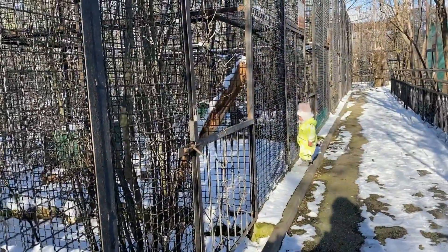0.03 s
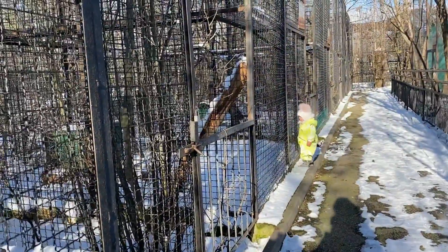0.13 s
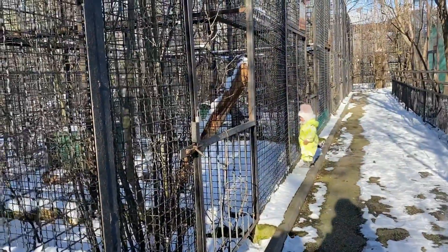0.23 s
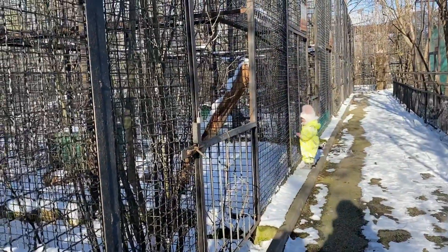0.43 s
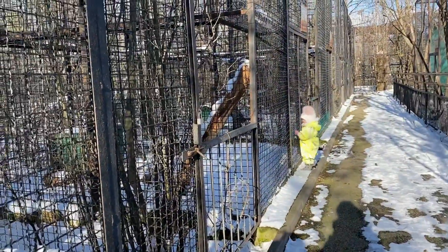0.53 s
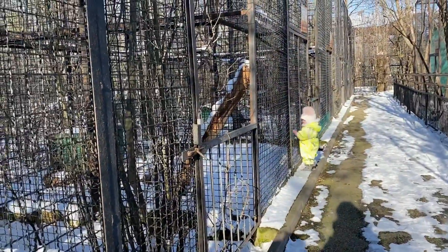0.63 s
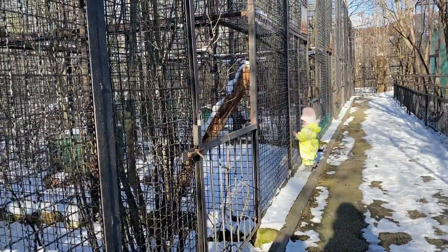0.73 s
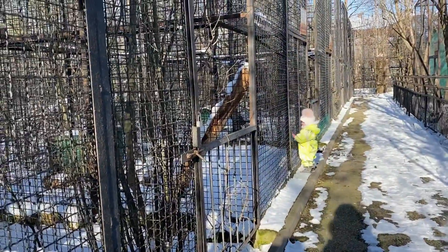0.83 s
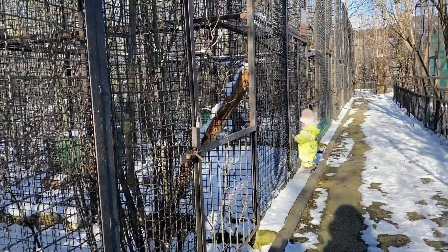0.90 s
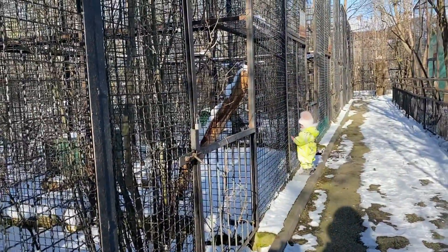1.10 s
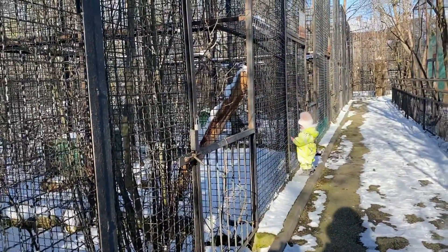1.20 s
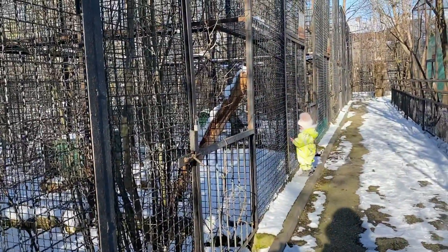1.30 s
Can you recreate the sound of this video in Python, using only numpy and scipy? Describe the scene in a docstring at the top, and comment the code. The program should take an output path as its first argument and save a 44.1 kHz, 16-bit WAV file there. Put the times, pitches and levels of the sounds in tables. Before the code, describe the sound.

Two quick, dry, snapping crunches with dull thuds, like icy snow or knocked wire mesh, close and slightly left; then weak bumps and light clothing rustle over a very faint low outdoor rumble.

```python
"""Outdoors, close to the microphone: near sounds lean left over a low distant rumble that lasts throughout.
A faint crunch and thud open it, over soft rustle; a dry tick follows at 0.1 s.
Near 0.25 and 0.48 s come two dry crunches, probably icy snow underfoot: scrapes and swarms of tiny contacts
swell to sharp snaps over dull thuds, unevenly coloured. Then a weak crunch, soft bumps and two strokes of
rustle, probably winter clothing, made of grainy impulses; a tiny reedy chirp of banded noise comes at 1.06 s."""
import sys
import numpy as np
from scipy.fft import rfft, irfft
from scipy.io import wavfile
from scipy.ndimage import map_coordinates

SR = 44100
rng = np.random.default_rng(int(sys.argv[2]) if len(sys.argv) > 2 else 0)


def dump(signal):
    """Clip the signal to [-1, 1] and save it as 16-bit WAV at the path in sys.argv[1]."""
    limited = np.clip(np.atleast_2d(signal).T, -1, 1)
    pcm = np.round(limited * 32767).astype(np.int16)
    wavfile.write(sys.argv[1], SR, pcm)


N = 59535

# crunches, swarms of hard contacts: crest_s, level_db, rise_db_per_s, fall_db_per_s, hollow_level_db
CRUNCHES = [(0.005, -40.5, 494, 531, -43), (0.253, -20.5, 554, 566.5, -26.5), (0.481, -27, 766, 698, -33.5),
            (0.664, -53.5, 290, 203, -56.5)]
# scrapes that lead into the crunches: crest_s, level_db, rise_db_per_s, fall_db_per_s
SCRAPES = [(0.160, -39, 606, 121), (0.205, -48, 212.5, 91), (0.234, -24, 682, 495), (0.25, -29, 908, 697.5),
           (0.449, -53.5, 602, 291.5), (0.465, -26.5, 715, 422)]
# sharp snaps: start_s, level_db, hollow_level_db
SNAPS = [(0.143, -52, -41.5), (0.2372, -23.5, -16), (0.2437, -20.5, -29), (0.245, -16.5, -24.5),
         (0.2513, -18.5, -24.5), (0.2550, -15.5, -24), (0.2648, -18, -43), (0.2722, -20, -36.5),
         (0.4597, -31, -32), (0.4736, -21.5, -28.5), (0.4790, -18, -29), (0.4858, -25, -30),
         (0.5072, -57, -52), (0.54, -47, -43.5)]
# brightest cracks: start_s, level_db
CRACKS = [(0.228, -35), (0.2345, -23.5), (0.243, -23.5), (0.2651, -46.5), (0.4727, -39.5)]
# relative colour of the hard contacts: freq_hz, gain_db
HARD_COLOUR = [(200, -25), (1150, -14.5), (1550, 7.5), (2300, -2.5), (3100, -3.5), (3700, -4),
               (4700, -10.5), (6600, -9), (7600, -20.5), (9000, -20), (11000, -25), (12500, -51.5),
               (15000, -62.5)]
# relative colour of the hollow body: freq_hz, gain_db
HOLLOW_COLOUR = [(60, -10), (200, -6.5), (300, -10), (450, -8.5), (560, -2), (690, 1), (850, -8.5),
                 (970, -9.5), (1200, -15), (2500, -28.5), (8000, -76.5)]
# relative colour of the scrapes: freq_hz, gain_db
SCRAPE_COLOUR = [(300, -30), (1100, -3.5), (1550, 6.5), (1950, -1.5), (2350, -8), (3000, -8.5), (3600, -17),
                 (6500, -29.5), (9000, -39)]
# relative colour of the cracks: freq_hz, gain_db
CRACK_COLOUR = [(1000, -33.5), (5000, 0.5), (7000, -4), (8500, -4), (11000, -10.5), (15000, -26.5)]
# uneven fine colour of the crunches, narrow bands relative to each other: centre_hz, width_hz, gain_db
CRUNCH_BANDS = [(1480, 43, -4), (1760, 76, -12.5), (2005, 32, 6.5), (2063, 28, -5.5), (2031, 14, 0),
                (2736, 37, 2), (3070, 150, 7), (3320, 150, 5), (4040, 34, 0.5), (4450, 45, -9.5),
                (4980, 62.8, 11), (5860, 470, 6)]
BANDS_DB = 3.5  # highest point of the bands against the direct contact
TRICKLE_DB, TRICKLE_FALL_DB_PER_S = -28.5, 124.5  # against the crest
CONTACTS_PER_S, CONTACT_SPREAD_DB, CLUMP_DB, CLUMPS_PER_S = 5000, 4, 2.5, 330
CRACK_T60_S = 0.028
SNAP_T60_S, SNAP_LENGTH_S = .012, .0025  # the length sets the energy at the given level

# thuds: start_s, level_db, pitch_hz, t60_s
THUDS = [(0.001, -27, 65.4, 0.092), (0.148, -39, 91.6, .16), (0.237, -26.5, 193.8, 0.064),
         (0.25, -27.5, 57.5, 0.14), (0.258, -26.5, 172, 0.089), (0.364, -32, 152, 0.1),
         (0.367, -34.5, 63, .10), (0.482, -36, 70.3, 0.25), (0.491, -32, 148, 0.077),
         (0.622, -41, 87, 0.18), (0.696, -44, 81, 0.2193), (0.846, -36.5, 190.3, 0.13),
         (0.849, -32.5, 310, 0.065), (0.859, -40.5, 70.6, 0.086)]
# relative colour of the puff in a thud: freq_hz, gain_db
PUFF_COLOUR = [(30, -1.5), (100, 5), (500, -0.5), (1000, -14), (3000, -25), (12000, -72.5)]
THUD_ATTACK_S, PUFF_DB = .005, -14  # the puff is relative to the thud

# path of the rustle: time_s, hiss_level_db, body_level_db
RUSTLE = [ (0, -55.5, -49), (.13, -56.5, -52), (.33, -55.5, -51.5), (0.578, -60.5, -51.5),
          (0.658, -60.5, -68), (0.758, -61, -55), (0.818, -67.5, -64.5), (.93, -66.5, -59.5),
          (.98, -71.5, -63.5), (1.018, -95, -91.5), (1.079, -76, -81.5), (1.15, -58.5, -57),
          (1.21, -60, -56.5), (1.29, -64.5, -56.5), (1.35, -59, -54.5)]
# catches of the cloth: start_s, hiss_level_db, body_level_db
CATCHES = [(0.682, -54, -48), (0.846, -55.5, -40.5), (0.919, -64.5, -52), (1.105, -61, -62),
           (1.141, -60.5, -49), (1.159, -51, -55), (1.205, -53, -58), (1.214, -50.5, -57),
           (1.245, -79, -44.5), (1.251, -50.5, -48.5), (1.272, -51, -46)]
# relative colour of the cloth hiss: freq_hz, gain_db
CLOTH_COLOUR = [(800, -19.5), (1300, 2.5), (2250, -7), (3000, -3), (3600, -11), (5500, -3.5), (7000, -13.5),
                (8000, -12.5), (10000, -16), (12500, -38.5), (14500, -30.5)]
# relative colour of the cloth body: freq_hz, gain_db
CLOTH_BODY_COLOUR = [(60, -5.5), (170, -5), (400, -3.5), (560, -1), (750, -11.5), (1000, -9.5),
                     (1500, -21.5), (4000, -50)]
# narrow bands of the first stroke, ahead of the cloth colour: centre_hz, width_hz, gain_db
FIRST_STROKE = [(1930, 153, -16.5), (2750, 88, 0.5), (4943, 164, -1), (6580, 280, -3)]
# narrow bands of the second stroke, ahead of the cloth colour: centre_hz, width_hz, gain_db
SECOND_STROKE = [(3114, 410, 0.5), (3800, 150, -15), (4950, 210, -6.5), (6430, 230, -5)]
FIBRES_PER_S, FIBRE_SPREAD_DB, CATCH_T60_S = 6000, 4, .026
STROKE_START_S, TURN_S = .62, .94
STROKE_DB, FLUTTER_DB, FLUTTER_PER_S = 1, 2.5, 140  # the stroke is relative to the hiss

# relative colour of the tick: freq_hz, gain_db
TICK_COLOUR = [(400, -21), (800, -10), (1150, -4), (1700, -8), (3500, -15), (7000, -42), (12000, -61.5)]
TICK_S, TICK_DB, TICK_T60_S = .0975, -44, .025
CHIRP_S, CHIRP_LENGTH_S, CHIRP_HZ, CHIRP_WIDTH_HZ, CHIRP_DB = 1.058, .007, 6280, 380, -64
# relative colour of the far rumble: freq_hz, gain_db
RUMBLE_COLOUR = [(20, -49.5), (45, -10), (72, -1.5), (100, 3.5), (130, -16.5), (300, -22.5), (1000, -39),
                 (3000, -34.5), (7000, -42), (12000, -49.5)]
RUMBLE_DB, RUMBLE_LEFT_DB = -61, 1  # the second is extra gain on the left

# balance of the near sounds: freq_hz, left_minus_right_db
BALANCE = [(60, 3.5), (250, 4.5), (420, 4), (700, 8.5), (950, 8.5), (1250, 2.5), (1700, 2), (2200, -0.5),
           (15000, 1)]
# how much sooner the left port hears; bass bends around the body: freq_hz, lead_s
PORT_LEAD = [(100, .00055), (260, .00069), (430, .00075), (600, .00068), (1000, .00037), (1500, .00037),
             (2050, .00032), (2600, .00039), (3200, .00039), (4000, .00044), (6500, .00047),
             (10000, .00036), (14000, .00023)]
# relative gain of the scatter off nearby surfaces: freq_hz, gain_db
SCATTER_COLOUR = [(100, -5.5), (1000, -1.5), (2000, -1.5), (4000, 7.5), (8000, 9.5), (13000, 3)]
SCATTER_DB, SCATTER_T60_S, SHIFTS_PER_S = -10, .018, 120
TOP_HZ = 15750


def amp(db):
    """Decibels to gain."""
    return 10 ** (np.asarray(db) / 20)


def unit(x):
    """Scale to rms 1."""
    return x / np.sqrt(np.mean(x ** 2) + 1e-20)


def unit_power(response):
    """Scale a response to mean power 1."""
    return response / np.sqrt(np.mean(abs(response) ** 2))


def along(points, hz):
    """Read a curve of (frequency, value) points on a log axis."""
    f, v = np.transpose(points)
    return np.interp(np.log(hz + 1), np.log(f + 1), v)


def clock():
    """Time of every sample in seconds."""
    return np.arange(N) / SR


def bins():
    """Frequencies of the filter grid in Hz."""
    return np.fft.rfftfreq(2 * N, 1 / SR)


def filtered(x, response):
    """Pass a sound through a response on the filter grid."""
    return irfft(rfft(x, 2 * N) * response)[..., :N]


def colour(points):
    """Minimum-phase response of unit power, so that nothing sounds ahead of its blow."""
    cepstrum = irfft(np.log(amp(along(points, bins()))))
    # fold the cepstrum onto positive time
    cepstrum[1:N] *= 2
    cepstrum[N + 1:] = 0
    return unit_power(np.exp(rfft(cepstrum)))


def narrow_bands(table):
    """Sum of bell-shaped bands, scaled to a highest gain of 1."""
    f = bins()
    total = sum(amp(db) * 1j * f * width / (centre * centre - f * f + 1j * f * width)
                for centre, width, db in table)
    return total / abs(total).max()


def ticks(per_s, spread_db):
    """Tiny impulses at random times with scattered sizes and signs, rms 1."""
    hit = rng.random(N) < per_s / SR
    size = amp(spread_db * np.clip(rng.standard_normal(N), -2, 2))
    return unit(hit * rng.choice([-1, 1], N) * size)


def wobble(rate):
    """A smooth random curve with rate knots a second."""
    return map_coordinates(rng.standard_normal(1000), [clock() * rate], mode="wrap")


def decay(start, t60):
    """Envelope that jumps to 1 and dies away by 60 dB in t60 seconds."""
    age = clock() - start
    return (age >= 0) * np.exp(-np.log(1000) * np.maximum(age, 0) / t60)


def swell(crest, rise, fall):
    """Envelope that climbs to a crest and falls, leaving a weak trickle."""
    age = clock() - crest
    main = amp(np.minimum(rise * age, -fall * age))
    trickle = amp(TRICKLE_DB + np.minimum(rise * age, -TRICKLE_FALL_DB_PER_S * age))
    return np.hypot(main, trickle)


def crunches():
    """Scrapes, contact swarms, cracks and snaps, with narrow bright bands and a hollow body."""
    hard = sum((amp(db) * swell(s, rise, fall)) ** 2 for s, db, rise, fall, _ in CRUNCHES)
    hollow = sum((amp(db) * swell(s, rise, fall)) ** 2 for s, _, rise, fall, db in CRUNCHES)
    scrape = sum((amp(db) * swell(s, rise, fall)) ** 2 for s, db, rise, fall in SCRAPES)
    crack = sum((amp(db) * decay(s, CRACK_T60_S)) ** 2 for s, db in CRACKS)

    uneven = 1 + amp(BANDS_DB) * narrow_bands(CRUNCH_BANDS)
    bright = unit_power(colour(HARD_COLOUR) * uneven)
    body = colour(HOLLOW_COLOUR)

    swarm = contacts(hard, bright) + contacts(hollow, body)
    swarm += contacts(scrape, colour(SCRAPE_COLOUR) * uneven)
    swarm += contacts(crack, colour(CRACK_COLOUR))
    return swarm + filtered(snaps(), np.array([bright, body])).sum(axis=0)


def contacts(power, response):
    """A clumpy swarm of tiny impacts follows a power curve and is heard through a response."""
    clumps = amp(CLUMP_DB * wobble(CLUMPS_PER_S))
    swarm = unit(ticks(CONTACTS_PER_S, CONTACT_SPREAD_DB) * clumps)
    return filtered(np.sqrt(power) * swarm, unit_power(response))


def snaps():
    """Brief noise bursts of set energy, one drive for the bright colour and one for the hollow body."""
    drive = np.zeros((2, N))
    for s, db, body_db in SNAPS:
        burst = rng.standard_normal((2, N)) * decay(s, SNAP_T60_S)
        burst /= np.linalg.norm(burst, axis=1, keepdims=True)
        drive += amp([[db], [body_db]]) * np.sqrt(SNAP_LENGTH_S * SR) * burst
    return drive


def thuds():
    """Soft heavy contacts: a dying low tone with a soft attack and a dull puff of noise."""
    out = np.zeros(N)
    for s, db, hz, t60 in THUDS:
        age = np.maximum(clock() - s, 0)
        tone = np.sin(2 * np.pi * hz * age) * (1 - np.exp(-age / THUD_ATTACK_S))
        puff = amp(PUFF_DB) * unit(filtered(rng.standard_normal(N), colour(PUFF_COLOUR)))
        out += amp(db) * decay(s, t60) * (tone + puff)
    return out


def fibres():
    """Cloth fibres slip as a grain of tiny impulses."""
    return ticks(FIBRES_PER_S, FIBRE_SPREAD_DB)


def rustle():
    """Cloth slides, nearly stops, slides again and catches; two strokes have fluttering narrow bands."""
    t = clock()
    s, hiss_db, body_db = np.transpose(RUSTLE)
    hiss, body = amp(np.interp(t, s, hiss_db)), amp(np.interp(t, s, body_db))
    for start, db, low_db in CATCHES:
        catch = decay(start, CATCH_T60_S)
        hiss = np.hypot(hiss, amp(db) * catch)
        body = np.hypot(body, amp(low_db) * catch)
    out = filtered(hiss * fibres(), colour(CLOTH_COLOUR))
    out += filtered(body * fibres(), colour(CLOTH_BODY_COLOUR))

    first = (t > STROKE_START_S) & (t < TURN_S)
    for table, sliding in [(FIRST_STROKE, first), (SECOND_STROKE, t >= TURN_S)]:
        response = unit_power(narrow_bands(table) * colour(CLOTH_COLOUR))
        flutter = amp(STROKE_DB + FLUTTER_DB * wobble(FLUTTER_PER_S))
        out += filtered(sliding * hiss * flutter * fibres(), response)
    return out


def ports(x, count=4):
    """Left leads in time; contacts shift about, so the scatter off nearby surfaces keeps changing."""
    f, side = bins(), np.array([[.5], [-.5]])  # half of each difference goes to either port
    gain = amp(side * along(BALANCE, f))
    lead = np.exp(2j * np.pi * f * side * along(PORT_LEAD, f))
    out = filtered(x, gain * lead)

    scatter_gain = amp(SCATTER_DB + along(SCATTER_COLOUR, f))
    shares = np.array([wobble(SHIFTS_PER_S) for _ in range(count)])
    # the shares keep a constant total power
    for share in shares / np.linalg.norm(shares, axis=0):
        tail = rng.standard_normal((2, N)) * decay(0.0013, SCATTER_T60_S)
        tail /= np.linalg.norm(tail, axis=1, keepdims=True)
        out = out + filtered(x * share, rfft(tail, 2 * N) * scatter_gain)
    return out


def tick():
    """One dry tick, as of a twig: a coloured burst of decaying noise."""
    burst = amp(TICK_DB) * decay(TICK_S, TICK_T60_S) * rng.standard_normal(N)
    return filtered(burst, colour(TICK_COLOUR))


def chirp():
    """One short, high, reedy note far away: a narrow noise band under a bell-shaped envelope."""
    response = np.exp(-((bins() - CHIRP_HZ) / CHIRP_WIDTH_HZ) ** 2)
    band = unit(filtered(rng.standard_normal((2, N)), response))
    return amp(CHIRP_DB) * np.exp(-((clock() - CHIRP_S) / CHIRP_LENGTH_S) ** 2) * band


def rumble():
    """Steady far noise, nearly alike in both ports and a little stronger on the left."""
    noise = rng.standard_normal(N) + .3 * rng.standard_normal((2, N))
    steady = amp(RUMBLE_DB) * unit(filtered(noise, colour(RUMBLE_COLOUR)))
    return steady * amp([[RUMBLE_LEFT_DB], [0]])


def scene():
    """The near sounds share one direction; the tick, the chirp and the rumble lie behind them."""
    near = crunches() + thuds() + rustle()
    return ports(near) + tick() + chirp() + rumble()


def record(dry):
    """The recorder keeps nothing above its band limit."""
    return filtered(dry, bins() < TOP_HZ)


dry = scene()
out = record(dry)
dump(out)
```